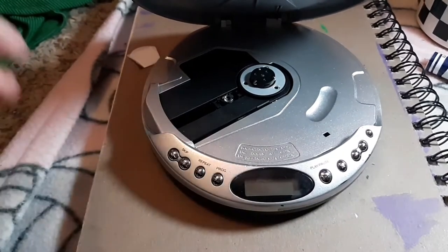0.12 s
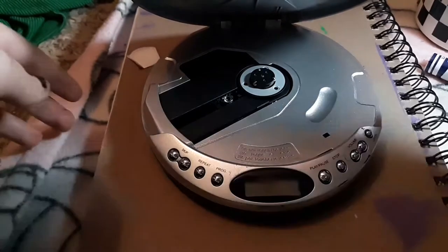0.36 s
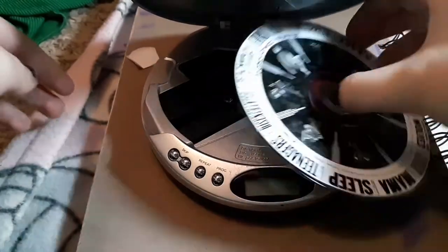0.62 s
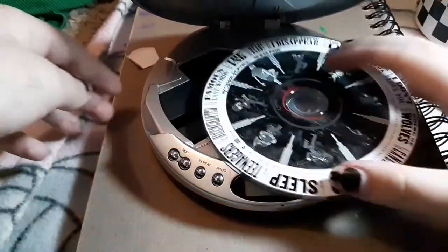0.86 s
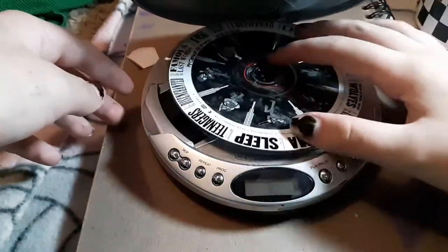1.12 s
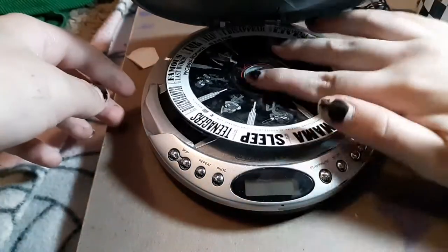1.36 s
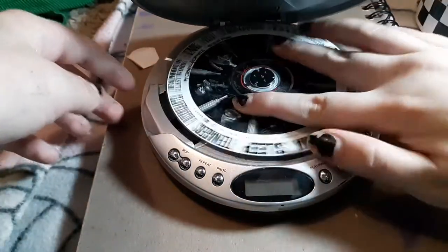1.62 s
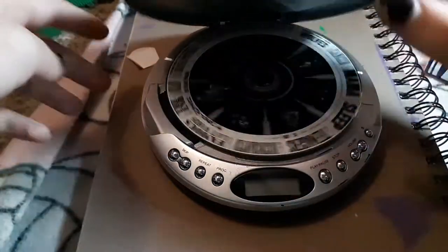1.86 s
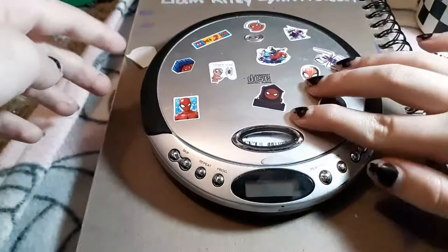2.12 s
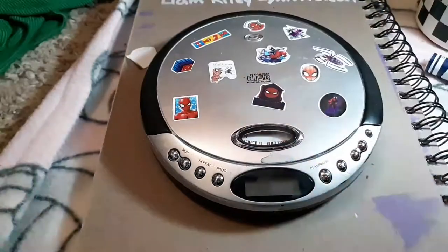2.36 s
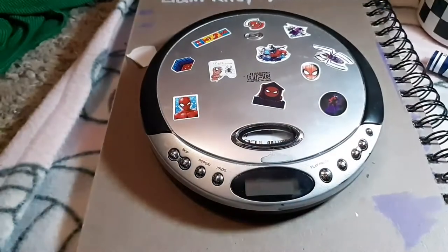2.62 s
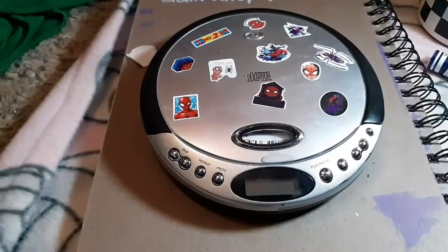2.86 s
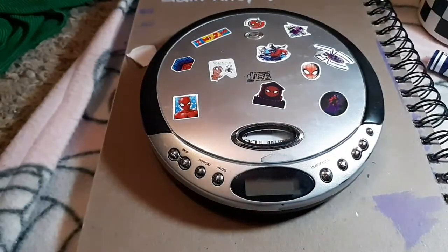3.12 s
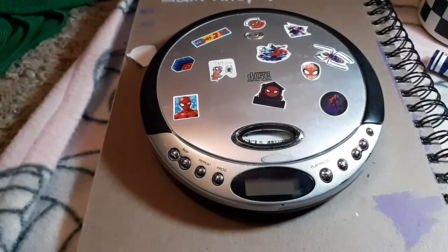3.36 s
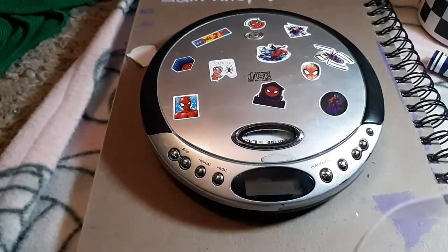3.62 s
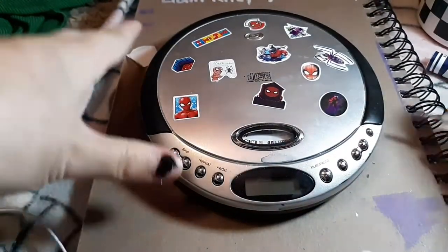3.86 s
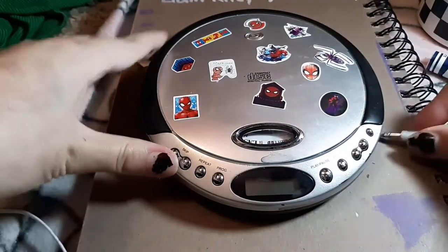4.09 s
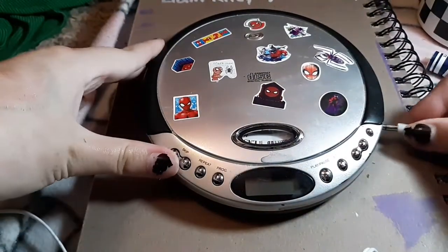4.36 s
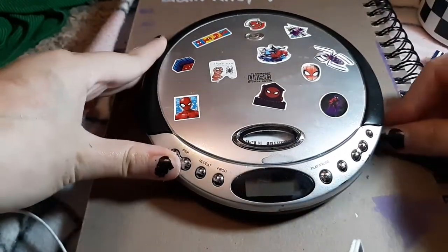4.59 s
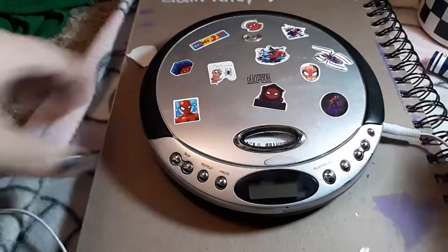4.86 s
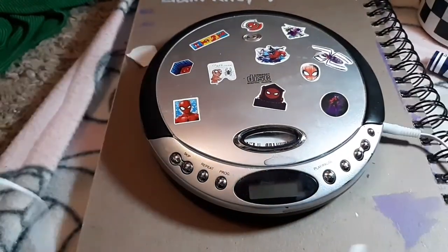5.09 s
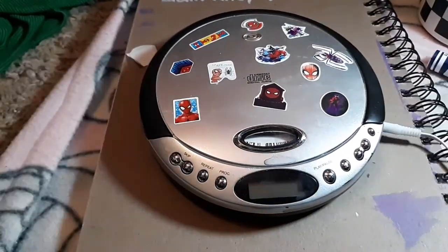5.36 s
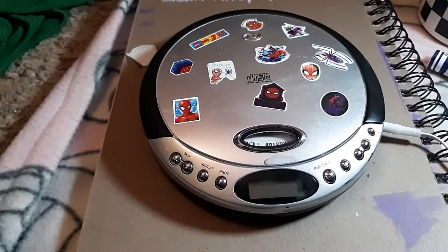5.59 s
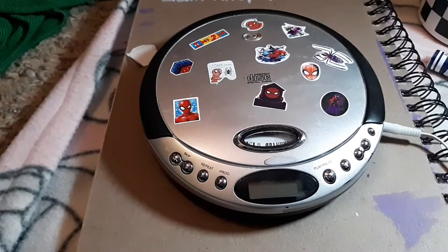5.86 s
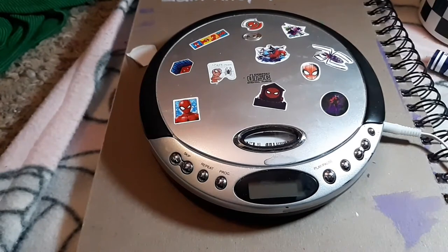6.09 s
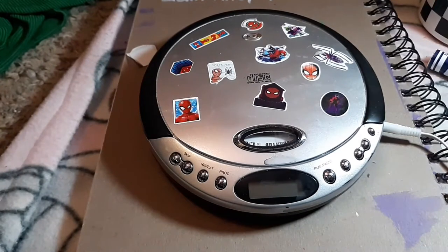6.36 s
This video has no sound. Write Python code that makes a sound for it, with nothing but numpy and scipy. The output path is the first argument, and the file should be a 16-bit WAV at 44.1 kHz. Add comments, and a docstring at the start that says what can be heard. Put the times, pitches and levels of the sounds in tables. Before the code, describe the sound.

Sharp plastic clacks, a loud lid snap and a soft plug click over faint low appliance hum, ending with bright, close taps on the left.

```python
"""A disc drops into a plastic portable player and is pressed onto the hub, the lid snaps shut, a plug goes in:
runs of tiny impacts ring the resonances of the shell and the lid latch, and heavy touches add low thuds.
Hands and a cable rustle on cloth and card as swelling, grainy noise.
A finger taps the left microphone: bright clicks and one push of air.
An appliance drones in the room as shaped noise and wavering tones, over hiss; this background dips twice."""
import sys
import numpy as np
from scipy import signal
from scipy.fft import rfft, irfft, next_fast_len
from scipy.io import wavfile
from scipy.ndimage import uniform_filter1d

SR = 44100
rng = np.random.default_rng(int(sys.argv[2]) if len(sys.argv) > 2 else 0)


def voltage_ratio(decibels):
    """Convert decibels (scalar or array-like) to amplitude ratios, 20 dB per decade."""
    exponent = np.asarray(decibels, float) / 20
    return 10 ** exponent


def wav_record(signal):
    """Record a signal, one row per channel, as 16-bit PCM in the file named by sys.argv[1]."""
    frames = np.transpose(np.atleast_2d(signal))
    bounded = np.clip(frames, -1, 1)
    # unit amplitude maps onto the largest positive 16-bit level
    quanta = np.round(bounded * 32767).astype(np.int16)
    wavfile.write(sys.argv[1], SR, quanta)


N = 285327

# touches of disc, cable and plug: t/s, level/dB, favoured f/Hz of the spot struck, hardness/(dB per octave)
CONTACTS = [(0.588, -20.5, 990, 0.5), (0.6579, -5, 1330, 1.5), (0.6625, -10.5, 960, 0.5),
            (0.6649, -13, 6400, 2), (0.672, -20, 4200, 2), (0.679, -17, 5500, 1.5),
            (0.683, -10.5, 1200, -3), (0.686, -15, 6500, 2), (0.694, -16.5, 1100, -2.5),
            (0.706, -20, 5400, -3.5), (0.718, -25, 5000, -6), (0.724, -24.5, 1100, -7),
            (0.733, -24.5, 1290, -6), (0.748, -25.5, 1190, -6), (0.755, -25, 1300, -3),
            (0.762, -32, 1200, -7), (0.779, -34.5, 1040, -3), (0.841, -29, 3600, -4.5),
            (0.890, -22, 1220, -2.5), (1.011, -30.5, 1460, -0.5), (1.091, -26.5, 1460, -2),
            (1.097, -20, 1430, 0), (1.103, -23.5, 1470, 0.5), (1.204, -35, 1353, -11),
            (1.278, -34, 6200, 1), (1.281, -30.5, 1450, -4.5), (1.489, -34, 3000, -0.5),
            (1.506, -15, 1000, -3), (1.5097, -8.5, 6000, 1.5), (1.5115, -15.5, 1050, -2),
            (1.518, -23.5, 3880, -2), (1.524, -21.5, 1016, 1), (2.0, -45.5, 9030, 6),
            (2.847, -42.5, 3890, 1.5), (2.864, -36, 6200, 9), (2.888, -39.5, 4470, 1),
            (2.924, -45.5, 4960, -3), (3.426, -42.5, 3440, 1.5), (4.023, -38.5, 991, -0.5),
            (3.685, -45, 3000, 0), (4.252, -33, 2620, 2), (4.443, -33.5, 2210, 2), (4.463, -34, 900, -2),
            (4.483, -41, 993, -5.5), (4.56, -27, 3080, 2.5)]
# resonances of the plastic shell: f/Hz, width/Hz, level/dB
SHELL_MODES = [(900, 200, -1.5), (1040, 200, -2), (1440, 220, -2.5), (2200, 250, -1.5), (2967, 170, -3),
               (3600, 190, -2.5), (4200, 150, -3), (4970, 250, -7), (5520, 160, -4.5), (6412, 600, -5),
               (9700, 1500, -22), (11400, 3800, -19.5), (14400, 4000, -19)]
# resonances of the lid latch: f/Hz, width/Hz, level/dB
LATCH_MODES = [(1587, 140, -10.5), (2800, 1200, -10.5), (4240, 310, -5), (5135, 300, -12),
               (5807, 260, -10.5), (6620, 450, -3.5), (7164, 270, -6.5), (9700, 500, -17.5),
               (12190, 780, -5), (14160, 3000, -7.5)]
# skin and cable sliding: middle t/s, a third of the length/ms, level/dB, centre f/Hz of the swish
RUBS = [(.06, 46, -60.5, 4600), (0.564, 27, -59, 1500), (.715, 47, -38, 4470), (.80, 20, -56.5, 1300),
        (.93, 45, -57, 2860), (1.022, 26, -49.5, 2800), (1.087, 10, -49, 1990), (1.425, 23.4, -56.5, 5000),
        (1.84, 19, -63, 5140), (2.005, 16, -57.5, 8990), (2.56, 52, -66, 8030), (2.848, 19, -56.5, 5000),
        (3.475, 20.6, -54.5, 6640), (3.78, 108, -58, 4850), (4.05, 14, -55.5, 2500),
        (4.188, 16.6, -57, 4000), (4.78, 40, -63.5, 5040), (5.04, 34, -60.5, 6020), (5.535, 19, -59, 3510)]
# finger on the microphone: t/s, left level/dB, right level/dB, click f/Hz, click width/Hz
TAPS = [(5.3898, -4, -45, 6170, 2650), (5.467, -13.5, -52.5, 4300, 4450), (5.611, -36, -47.5, 2800, 900)]
# thuds through the case into the card below: t/s, level/dB, f/Hz
THUDS = [(.684, -33, 386), (1.096, -28, 487), (1.508, -25, 344), (1.509, -25, 694), (2.029, -25, 375),
         (2.033, -24, 870), (2.193, -47, 808), (2.925, -40, 420), (4.56, -37, 175)]
# where the hands work: t/s, left minus right level/dB
HAND_PLACES = [(2.499, 0), (2.8, 3.5), (3.8, 0.5), (4.0, -6)]
# colour of the appliance drone: f/Hz, relative level/dB
DRONE_COLOUR = [(30, -36.5), (65, -25), (108, -11.5), (194, -15), (210, -6.5), (232, -1), (269, -9.5),
                (526, -25.5), (620, -18), (706, -23), (888, -21), (1500, -39.5), (3300, -120)]
# steadier tones inside the drone: f/Hz, level/dB against the drone
HUM_TONES = [(114, -16), (231, -1)]
# colour of the air hiss, also of sliding cloth: f/Hz, relative level/dB
HISS_COLOUR = [(710, -26), (1200, 0.5), (1350, -4), (5070, -11.5), (6650, -12.5), (8170, -25), (15750, -25),
               (16050, -45)]
# how alike left and right are in the background: f/Hz, likeness (1 same, 0 unrelated, -1 opposite)
LIKENESS = [(60, 0.9), (180, 1), (550, 0.32), (1650, -0.44), (15000, 1)]
# dips of the background: start t/s, fall/s, hold/s, recovery/s, depth/dB
DIPS = [(1.351, 0.42, 0.72, 0.33, -4), (5.367, 0.3, 0.26, 0.23, -15)]

FULL_IMPACT = 3.6   # one strong impact against the random ones, whose typical size is 1


def at_hz(points, hz):
    """Reads a spectrum table on a log-frequency axis, much as we hear pitch."""
    return np.interp(np.log(hz), np.log(np.array(points)[:, 0]), np.array(points)[:, 1])


def rms_one(x):
    """Scales a sound to an average strength (rms) of 1."""
    return x / np.sqrt(np.mean(x ** 2) + 1e-20)


def resonance(x, hz, width_hz):
    """Rings at one frequency with gain 1 there; a narrow resonance rings longer."""
    r = np.exp(-np.pi * np.clip(width_hz, 5, 9000) / SR)
    feedback = [1, -2 * r * np.cos(2 * np.pi * hz / SR), r * r]
    return signal.lfilter([(1 - r * r) / 2, 0, (r * r - 1) / 2], feedback, x)


def near_pitch(hz, centre_hz):
    """Gives 1 at the favoured frequency, fading within an octave or so."""
    return np.exp(-(np.log2(hz / centre_hz) / 0.47) ** 2)


def add(out, sound, s):
    """Mixes a stereo sound in from time s."""
    i = max(round(s * SR), 0)
    out[:, i:i + sound.shape[1]] += sound[:, :N - i]


def coloured_noise(colour, low_hz, high_hz):
    """Stereo noise with frequency-dependent likeness; its shared part has rms 1 between the two frequencies."""
    size = next_fast_len(N)
    hz = np.fft.rfftfreq(size, 1 / SR) + 1e-3
    mid, side = rfft(rng.standard_normal((2, size))) * voltage_ratio(at_hz(colour, hz))
    alike = np.clip(at_hz(LIKENESS, hz), -.95, .995)
    mid, side = mid * np.sqrt(1 + alike), side * np.sqrt(1 - alike)
    band = (hz > low_hz) & (hz < high_hz)
    in_band = np.sqrt(2 * np.sum(np.abs(mid[band]) ** 2)) / size
    return irfft(np.array([mid + side, mid - side]), size)[:, :N] / in_band


def dips():
    """The background level falls, holds and recovers, in dB."""
    t = np.arange(N) / SR
    return sum(np.interp(t, np.cumsum(times), [0, depth_db, depth_db, 0]) for *times, depth_db in DIPS)


def background():
    """A low appliance drone with a wavering hum, over air hiss."""
    drone_db, hiss_db = -52, -67.5
    t = np.arange(N) / SR
    pitch_drift = np.interp(t, np.linspace(0, t[-1], 150), rng.standard_normal(150)) * .03
    waver = np.cumsum(pitch_drift) / SR   # adding up the drift shifts the phase smoothly
    hum = sum(voltage_ratio(level_db) * np.sqrt(2) * np.sin(2 * np.pi * hz * (t + waver)) for hz, level_db in HUM_TONES)
    drone = coloured_noise(DRONE_COLOUR, 150, 350) + hum
    hiss = coloured_noise(HISS_COLOUR, 1500, 7000)
    return (drone * voltage_ratio(drone_db) + hiss * voltage_ratio(hiss_db)) * voltage_ratio(dips())


def room(x):
    """A small soft room: dense echoes that die away, different ones on each side."""
    room_db, t60_s = -23, 0.095   # t60: time to fall by 60 dB
    t = np.arange(int(.3 * SR)) / SR
    echoes = rng.standard_normal((2, len(t))) * voltage_ratio(-60 * t / t60_s) * (t > .003)
    echoes = echoes / np.sqrt(np.sum(echoes[0] ** 2))
    return voltage_ratio(room_db) * signal.fftconvolve(x, echoes, axes=1)[:, :N]


def taps():
    """Short bright clicks close to the left microphone, and one slowing push of air."""
    nail_s = .0004   # rise and fall of a tap
    scrape, crack, pad, pad_hz = .12, 0.16, 0.56, 1720   # shares of scrape, open crack and duller fingertip
    thump_s, thump_db, first_swing_ms, port_hz = 5.3893, -16.5, 1.33, 12
    out, t = np.zeros((2, N)), np.arange(4000) / SR
    for s, left_db, right_db, hz, width_hz in TAPS:
        on_port = np.clip((left_db - right_db) / 30, .05, 1)   # nearer 1 when right on the left port
        strike = np.exp(-np.abs(t - .004) / nail_s)
        scraping = scrape * on_port ** 2 * np.exp(-np.maximum(t - .004, 0) / 0.0016)   # before and after
        nail = rng.standard_normal(4000) * (strike + scraping)
        nail[int(.004 * SR)] = FULL_IMPACT
        click = resonance(resonance(nail, hz, width_hz), hz, width_hz)
        fingertip = pad * (width_hz / hz) ** 2 * resonance(nail, pad_hz, pad_hz)
        click = click + on_port * (crack * np.diff(nail, prepend=0) + fingertip)
        add(out, click / np.abs(click).max() * voltage_ratio(np.array([[left_db], [right_db]])), s - .004)
    swing = np.sqrt(t / (first_swing_ms / 1000))   # three ever longer swings
    push = np.sin(np.pi * swing) * np.exp(-(swing / 2.9) ** 9) * voltage_ratio(thump_db)
    push = signal.lfilter(*signal.butter(1, [port_hz, 1500], "band", fs=SR), push)
    add(out, push * np.array([[1], [0]]), thump_s)   # left only
    return out


def shell(force, modes, tilt_db, spot_hz, spread_db):
    """Each resonance gets its own strength and radiates unevenly, so one microphone hears it a little late."""
    out, chance = 0, rng.standard_normal((len(modes), 2))
    for k, (hz, width_hz, level_db) in enumerate(modes):
        level_db = level_db + tilt_db * np.log2(hz / 2000) + 8.5 * near_pitch(hz, spot_hz)
        strength = np.sqrt(width_hz) * voltage_ratio(level_db + spread_db * chance[k, 0])
        rung = rms_one(resonance(force, hz, width_hz)) * strength
        lag = round(min(abs(chance[k, 1]) * 5, .16 * SR / hz))   # about a sixth of a cycle at most
        late = np.concatenate([np.zeros(lag), rung[:len(rung) - lag]])
        pair = np.array([rung, late] if chance[k, 1] > 0 else [late, rung])
        out = out + (-1) ** k * pair
    return out


def scuffs():
    """Every contact drags a short scuff, stronger for a stronger touch."""
    scuff_db, follows = -54, .5   # level at a -25 dB contact, share of the contact's strength
    third_ms, late_ms, centre_hz = 18, 7, 3000
    return [(s + late_ms / 1000, third_ms, scuff_db + follows * (level_db + 25), centre_hz)
            for s, level_db, *_ in CONTACTS]


def rubs():
    """Dense uneven grains under a swelling stroke, partly through the shell, partly as open hiss."""
    out = np.zeros((2, N))
    for s, third_ms, level_db, centre_hz in RUBS + scuffs():
        size = int(max(third_ms, 5) / 1000 * SR * 3)
        unevenness = voltage_ratio(4.5 * rng.exponential(1, 20000)[:size].clip(0, 4))
        grains = rng.standard_normal((2, 20000))[:, :size] * unevenness
        hz = np.fft.rfftfreq(size, 1 / SR) + 1
        colour_db = at_hz(HISS_COLOUR, hz) + 3.2 * near_pitch(hz, centre_hz) + 2.4 * np.log2(hz)
        cloth = irfft(rfft(grains) * voltage_ratio(colour_db), size)
        plastic = shell(grains[0], SHELL_MODES, 0.99, centre_hz, spread_db=-1.0)
        sound = 0.27 * rms_one(plastic) + rms_one(cloth)
        add(out, sound * np.hanning(size) * voltage_ratio(level_db), s - size / 2 / SR)
    return out


def thuds():
    """Each thud swells over one cycle while it dies away by 60 dB in 14 cycles."""
    out, t = np.zeros((2, N)), np.arange(5000) / SR
    for s, level_db, hz in THUDS:
        fading = np.sin(2 * np.pi * hz * t) * voltage_ratio(level_db - 60 * t * hz / 14)
        add(out, fading * np.minimum(t * hz, [[1], [1]]), s)   # same on both sides
    return out


def blow(modes, level_db, hard_db, spot_hz, chatter_ms, build_ms, hold_ms):
    """A contact is a quick run of micro-impacts that builds up, holds and chatters out."""
    soft_hz, sharp_fade = 2500, 1.2   # late impacts carry little above this; how much faster sharp ones die
    t, build = np.arange(5000) / SR, max(build_ms, .1) / 1000
    fading_s = np.maximum(t - build - hold_ms / 1000, 0)
    strength = np.minimum(t / build, 1) ** 2 * voltage_ratio(-60 * fading_s / (max(chatter_ms, 2) / 1000))
    impacts = rng.standard_normal(5000) * (rng.random(5000) < .2)   # about one sample in five is struck
    impacts[int(build * SR)] = FULL_IMPACT
    soft = signal.lfilter(*signal.butter(2, soft_hz, fs=SR), impacts)
    sharp = impacts - soft
    force = soft * strength + sharp * (strength ** sharp_fade + 0.07 * strength)
    sound = shell(force, modes, hard_db, spot_hz, spread_db=0.0)
    loudest = np.sqrt(uniform_filter1d(np.mean(sound ** 2, axis=0), size=90).max())   # rms over 2 ms
    return sound * voltage_ratio(level_db - 7.5) / loudest


def contacts():
    """All touches ring the shell; the closing lid rings its latch."""
    chatter_ms, hold_ms = 19, 1.3   # of a -15 dB contact: time to fall by 60 dB, and hold before it
    chatter_follows = 0.23   # stronger contacts chatter longer: share of their strength
    snap_s, snap_db, snap_ms = 2.0285, -2.5, 15   # latch: time, level, chatter
    out = np.zeros((2, N))
    for s, level_db, spot_hz, hard_db in CONTACTS:
        longer = voltage_ratio(chatter_follows * (level_db + 15))
        add(out, blow(SHELL_MODES, level_db, hard_db, spot_hz, chatter_ms * longer, 0.4, hold_ms * longer), s)
    add(out, blow(LATCH_MODES, snap_db, 0, 5500, snap_ms, 2.2, hold_ms=1.5), snap_s)
    # thin plastic radiates no bass
    return signal.sosfilt(signal.butter(4, 760, "high", fs=SR, output="sos"), out)


def placed(x):
    """Sounds on the right are louder there, and the recorder's body shades their top octave."""
    shadow_hz, shadow_width_hz, shadow = 7940, 1700, 0.4   # a dip in the pick-up; share removed
    shade = 3.5   # dB of treble lost per dB of lean to the right
    x = x - shadow * resonance(x, shadow_hz, shadow_width_hz)
    pan_db = np.interp(np.arange(N) / SR, *np.transpose(HAND_PLACES))
    low = signal.sosfilt(signal.butter(6, 7600, "low", fs=SR, output="sos"), x)
    top = signal.sosfilt(signal.butter(6, 7600, "high", fs=SR, output="sos"), x)
    shaded = low - top * voltage_ratio(shade * np.minimum(pan_db, 0))   # minus, as the halves meet in opposite phase
    return shaded * voltage_ratio(np.array([pan_db, -pan_db]) / 2)


def scene():
    """Player and hands in the room, finger on the microphone, background."""
    near = placed(contacts() + rubs() + thuds())
    return near + room(near) + taps() + background()


def band_limit(x):
    """A steep low-pass at the top of the band."""
    return signal.sosfilt(signal.butter(12, 16840, fs=SR, output="sos"), x)


def record(dry):
    """Peaks are rounded off below a ceiling, then the very top of the treble is cut."""
    ceiling, cutoff_hz = .95, 16700   # the cut is 50 dB deep from here up
    rounded = ceiling * np.tanh(dry / ceiling)
    mix = signal.sosfilt(signal.cheby2(12, 50, cutoff_hz, fs=SR, output="sos"), rounded)
    return band_limit(mix)


dry = scene()
out = record(dry)
wav_record(out)
```